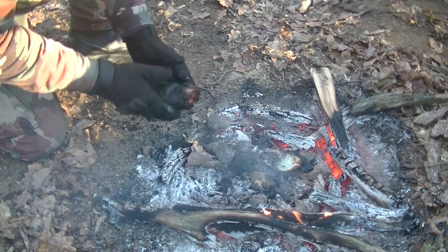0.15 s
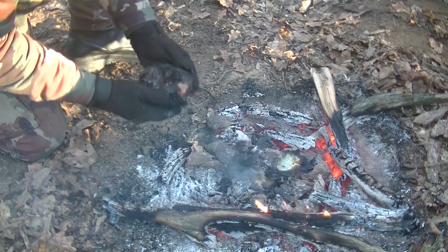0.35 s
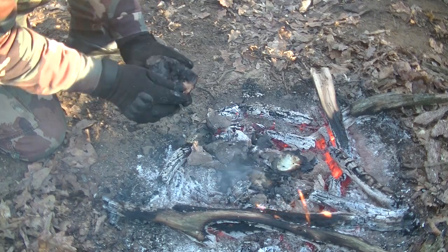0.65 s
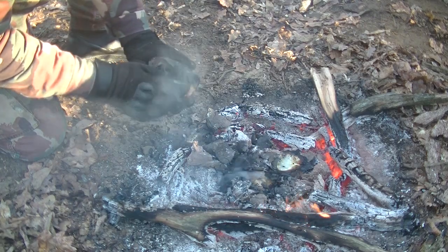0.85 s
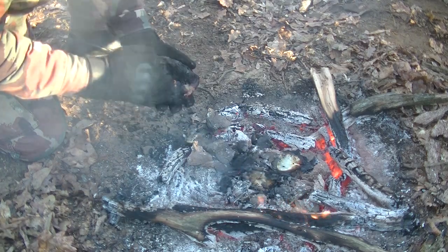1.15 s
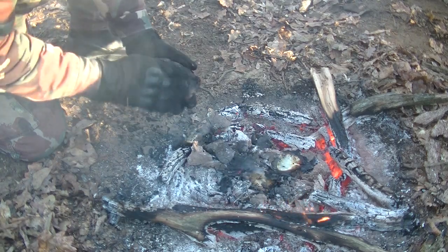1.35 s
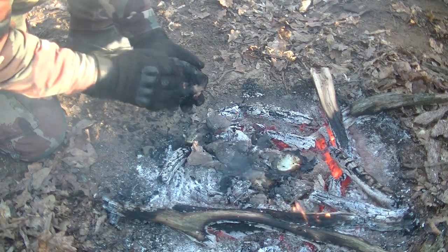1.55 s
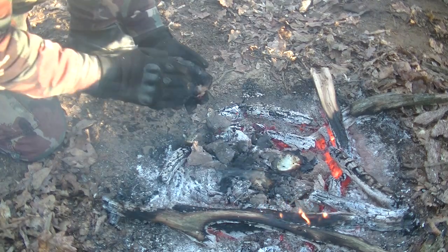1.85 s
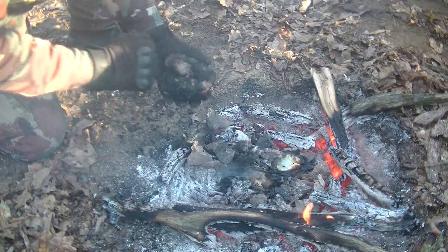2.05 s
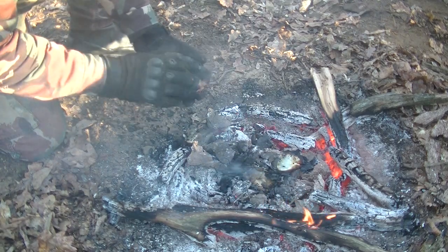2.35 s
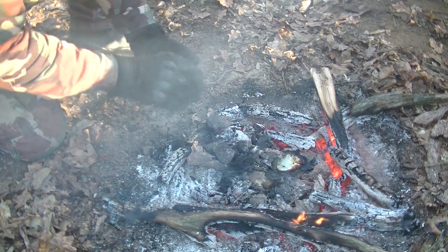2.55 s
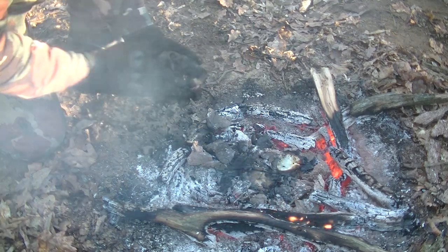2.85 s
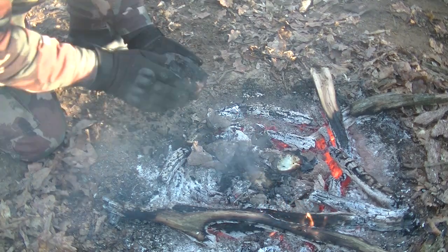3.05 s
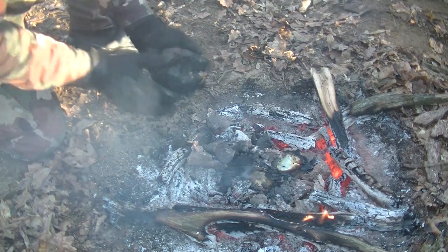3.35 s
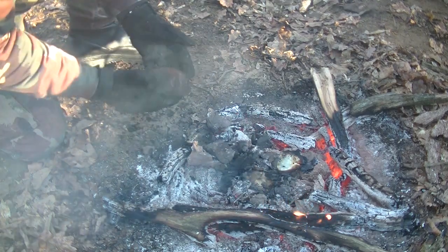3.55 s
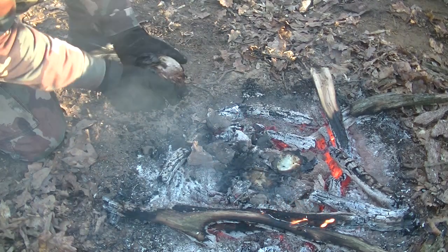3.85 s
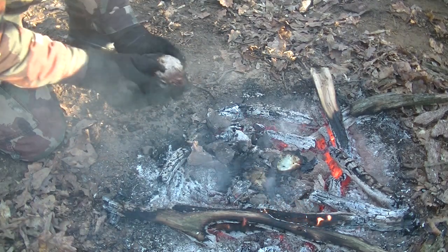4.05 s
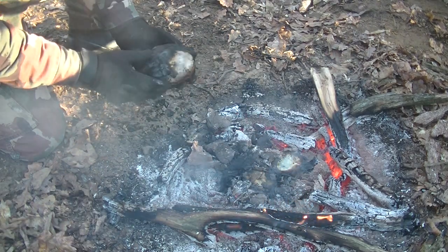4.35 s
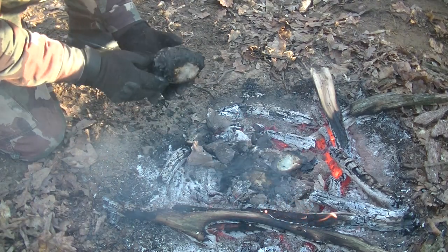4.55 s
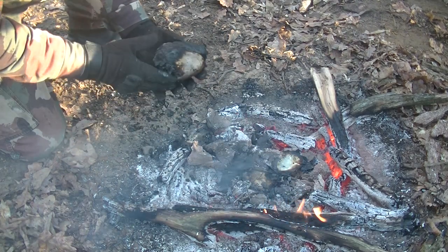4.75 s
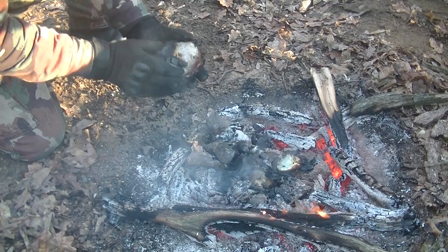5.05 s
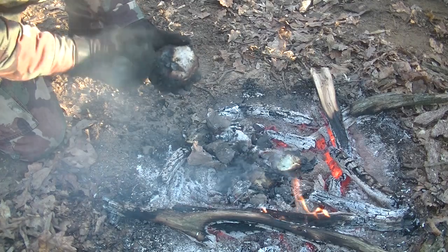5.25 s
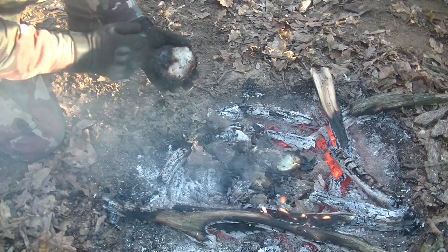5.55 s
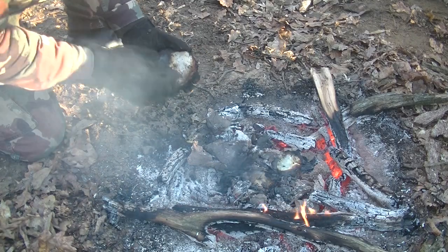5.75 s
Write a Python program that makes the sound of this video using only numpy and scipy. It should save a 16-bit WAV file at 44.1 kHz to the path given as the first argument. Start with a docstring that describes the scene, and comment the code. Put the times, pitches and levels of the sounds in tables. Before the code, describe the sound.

Gloved hands break a hardened clay crust close to a stereo microphone, outdoors in a quiet wood beside low embers. From 0 to 0.6 seconds come sharp snaps and small crunches, thickest near 0.5, with faint glove rub. After a brief easing, stronger gritty crunches arrive at about 1.05, 1.4, 1.7 and 2.0, with an especially hard snap near 1.36. A quieter stretch follows, holding stray clicks and soft low breeze buffets, until crumbling resumes at 2.85 and 3.15. A bright hard crack stands out at 3.8. Between 4 and 5 the clicks are scattered and lighter; a rub swells around 5.2, then a dense run of darker crunches and brittle snaps comes at 5.4 to 5.5, with more near 5.8. Underneath throughout: soft flickering ember hiss, tiny ticks of embers and falling crumbs, and a faint low woodland hush. The sound is dry, with subtle short outdoor scatter.

```python
"""Gloved hands squeeze and peel a crust of baked clay beside a low campfire in a wood.
Each squeeze is a short crunch of tiny ringing fractures, swelling out of the rub of the gloves.
Single flakes snap off: a burst of noise and a ring of a few milliseconds.
Shaped noise makes the hiss of the embers, the hush of the wood and a light breeze on the microphone;
sparse fractures make the faint ticks of embers and falling crumbs."""
import sys
import numpy as np
from scipy import signal
from scipy.fft import rfft, irfft, next_fast_len
from scipy.io import wavfile
from scipy.ndimage import uniform_filter1d

SR = 44100
rng = np.random.default_rng(int(sys.argv[2]) if len(sys.argv) > 2 else 0)


def materialize(psi):
    """Save the field psi as 16-bit PCM at rate SR to the path in sys.argv[1].

    A 1-D psi becomes a single channel; in a 2-D psi each row is a channel.
    """
    bounded = np.clip(np.atleast_2d(psi).T, -1, 1)
    quanta = np.round(bounded * 32767).astype(np.int16)
    wavfile.write(sys.argv[1], SR, quanta)


N = 259749
TIME = np.arange(N) / SR
SIZE = next_fast_len(N + SR // 2)   # room for filter tails
BIN_HZ = np.maximum(np.arange(SIZE // 2 + 1) * SR / SIZE, 1)
OPPOSITE = np.array([[1], [-1]])   # in phase at the left port, inverted at the right


def from_db(db):
    """Decibels to gain."""
    return 10 ** (np.asarray(db) / 20)


def rms_one(x):
    """Scale to rms 1."""
    return x / np.sqrt(np.mean(x ** 2) + 1e-20)


def per_bin(points):
    """Read a table at every frequency bin, straight lines over log frequency."""
    hz, value = np.transpose(points)
    return np.interp(np.log(BIN_HZ), np.log(hz), value)


def filtered(x, response):
    """Pass a sound through a frequency response."""
    return irfft(rfft(x, SIZE) * response, SIZE)[..., :N]


def colour(points):
    """Causal (minimum-phase) response of unit power with the given spectrum."""
    cepstrum = irfft(np.log(rms_one(from_db(per_bin(points)))), SIZE)
    # folding the cepstrum forward in time gives minimum phase
    cepstrum[1:SIZE // 2] *= 2
    cepstrum[SIZE // 2 + 1:] = 0
    return np.exp(rfft(cepstrum))


def drift(rate_hz):
    """Smooth random wander with spread 1, made of noise rolled off above the given rate."""
    return rms_one(filtered(rng.standard_normal(SIZE), 1 / (1 + (BIN_HZ / rate_hz) ** 2)))


def bell(x):
    """Smooth swell and fall, 1 at x = 0."""
    return np.exp(-np.minimum(x ** 2, 60))


def grains(per_s, spread_db, cycles, count=30):
    """Random tiny fractures, each a click that rings at one of many pitches, dying 60 dB in some cycles."""
    sizes = from_db(spread_db * np.minimum(rng.exponential(1, N), 2.5))
    signs = rng.choice([-1, 1], N)
    clicks = sizes * signs * (rng.random(N) < per_s / SR)
    dealt = rng.integers(0, count, N)
    ringing = 0
    for k, hz in enumerate(np.geomspace(1100, 15000, count)):
        w = 2 * np.pi * hz / SR
        r = np.exp(-np.log(1000) * hz / (cycles * SR))
        struck = clicks * (dealt == k) + 1e-18   # the tiny offset keeps the filter off zero
        ringing = ringing + signal.lfilter([1 - r, 0, r - 1], [1, -2 * r * np.cos(w), r * r], struck)
    return rms_one(rms_one(ringing) + 0.68 * rms_one(clicks))


# Tone of crumbling clay, only its shape counts: pitch_hz, density_db (per Hz)
CLAY_TONE = [(290, -52), (500, -20), (919, -18.5), (1510, -15), (2070, -3), (3110, -0.5), (3700, -1),
             (4090, -9.5), (4870, -2), (5550, -4), (6900, -2), (11100, -13.5), (12500, -17), (15100, -15.5),
             (16000, -22)]


def crumble(per_s=6500, clump_db=2.0):
    """Steady crumbling: fractures come in clumps, but the hand sets their overall force."""
    grit = grains(per_s, spread_db=4.5, cycles=7.8) * from_db(clump_db * drift(200))
    grit = filtered(grit, colour(CLAY_TONE))
    # even out the level over 600 samples
    return grit / np.sqrt(uniform_filter1d(grit ** 2, size=600) + 1e-12)


# Squeezes of the crust: peak_s, level_db, swell_s, brightness_db (fine crumbs over coarse)
SQUEEZES = [(0.187, -48, 0.011, -9), (0.452, -40.5, 0.018, -1.5), (0.497, -39.5, 0.022, -2.5),
            (0.597, -45, 0.021, 1.5), (1.052, -34.5, 0.017, 1), (1.118, -43.5, 0.029, -6.5),
            (1.395, -31, 0.022, 1.5), (1.688, -30.5, 0.023, 2.5), (1.983, -36, 0.017, -1),
            (2.014, -32.5, 0.01, 0.4), (2.833, -41.5, 0.013, -0.5), (2.868, -39, 0.01, 4),
            (3.128, -43.5, 0.021, -9), (3.154, -35.5, 0.0084, -3.5), (3.424, -38.5, 0.0067, -15),
            (3.764, -40, 0.0081, -6), (3.845, -42, 0.042, -11.5), (4.378, -43, 0.035, 6.5),
            (4.64, -47, 0.028, -1), (4.76, -48, 0.04, -4), (5.086, -42, 0.021, -2),
            (5.141, -38.5, 0.014, -3), (5.429, -35.5, 0.0087, -11), (5.458, -38, 0.019, -4.5),
            (5.488, -32.5, 0.0044, -8), (5.51, -40, 0.0056, -10), (5.757, -39.5, 0.0098, -11),
            (5.814, -38, 0.022, -1.5)]
# Gloves rubbing over the crust between squeezes: time_s, level_db
GLOVE_RUB = [(0.0, -53), (0.4, -53.5), (0.75, -59), (1.0, -51.5), (1.25, -68), (2.45, -62), (2.7, -81),
             (3.2, -59), (3.6, -53), (4.15, -54), (4.5, -58.5), (4.9, -56.5), (5.2, -48), (5.3, -68),
             (5.89, -83)]
FALL_PER_RISE = 0.97   # a squeeze dies away about as fast as it swells
SLIP_DB, SLIP_LENGTHS = -20.5, 2.17   # grip slipping around a squeeze: level under it, length in its lengths


def crunches(hinge_hz=4500, chunk_hz=1900, wide_hz=9000, rub_bright_db=0.5):
    """Each squeeze swells and dies over the rubbing gloves; fine crumbs sound bright, coarse chunks dark."""
    peak_s, level_db, swell_s, bright_db = np.transpose(SQUEEZES)[:, :, None]
    steps = TIME[::32]   # levels move slowly, so a coarse clock will do
    since = (steps - peak_s) / swell_s / np.where(steps < peak_s, 1, FALL_PER_RISE)
    slip = from_db(SLIP_DB) ** 2 * bell(since / SLIP_LENGTHS)
    squeeze_power = from_db(level_db) ** 2 * (bell(since) + slip)
    rub_power = from_db(np.interp(steps, *np.transpose(GLOVE_RUB))) ** 2
    power = np.vstack([squeeze_power, rub_power])

    fine_share = 1 / (1 + from_db(-np.vstack([bright_db, [rub_bright_db]])) ** 2)
    coarse_share = 1 - fine_share
    chunk_share = coarse_share ** 1.75 * 1.72   # big chunks come mostly from dark squeezes

    def envelope(share):
        """Gain over time of one grain size; an even share (one half) leaves the level as it is."""
        return np.interp(TIME, steps, np.sqrt(2 * (power * share).sum(0)))

    # crumbs break all over the crust, so the shortest waves differ between the ports
    apart = 0.48 / (1 + (wide_hz / BIN_HZ) ** 6)
    shared = filtered(crumble(), np.sqrt(1 - apart))
    grit = shared + filtered(crumble(), np.sqrt(apart)) * OPPOSITE
    lowest = filtered(grit, 1 / (1 + (BIN_HZ / chunk_hz) ** 4))
    lows = filtered(grit, 1 / (1 + (BIN_HZ / hinge_hz) ** 4))
    chunks = envelope(chunk_share) * lowest
    coarse = envelope(coarse_share) * (lows - lowest)
    fine = envelope(fine_share) * (grit - lows)
    return chunks + coarse + fine


def diffuse(spectrum, likeness):
    """Stereo noise from all around; likeness is the correlation of the ports, the shared part has rms 1."""
    mid, side = rng.standard_normal((2, N))
    likeness = np.clip(likeness, -.95, .95)
    width = np.sqrt((1 - likeness) / (1 + likeness))
    return filtered(mid + width * side * OPPOSITE, colour(spectrum))


# Tone of the ember hiss, only its shape counts: pitch_hz, density_db (per Hz)
EMBER_TONE = [(530, -22.5), (900, -13), (1700, -6.5), (1810, -3.5), (2020, -2.5), (3190, 0), (4680, -3),
              (6640, -4.5), (10000, -8.5), (12100, -13), (14700, -16.5), (16000, -16)]


def ember_hiss(shared_db=-54.5):
    """Embers hiss as diffuse noise whose level flickers by a decibel or so."""
    return from_db(shared_db) * diffuse(EMBER_TONE, likeness=0.31) * from_db(1.2 * drift(25))


# Tone of the hush of the wood, only its shape counts: pitch_hz, density_db (per Hz)
WOOD_TONE = [(15, -68), (25, -19), (96, -17), (130, -11), (192, -2.5), (297, 3), (593, -4), (679, -8.5),
             (738, -5.5), (1400, -15.5), (1820, -32), (3080, -120)]


def wood_hush(shared_db=-65.5):
    """The wood is a steady, low diffuse noise, nearly unrelated at the two ports."""
    return from_db(shared_db) * diffuse(WOOD_TONE, likeness=0.032)


# Tone of the breeze, only its shape counts: pitch_hz, density_db (per Hz)
BREEZE_TONE = [(25, -24), (60, -8.5), (90, -3), (135, 0), (220, -4), (330, -14.5), (600, -36)]
# Breeze brushing the microphone, level of the shared part before its flutter: time_s, level_db
BREEZE_GUSTS = [(0.0, -62), (0.11, -72), (0.16, -58.5), (0.33, -65.5), (0.59, -68), (0.64, -74), (0.7, -64),
                (0.82, -73), (0.87, -64), (0.95, -75), (1.51, -70), (1.76, -54.5), (2.12, -65.5),
                (2.15, -59), (2.25, -69), (2.38, -58.5), (2.74, -71.5), (2.84, -61.5), (2.87, -69.5),
                (3.18, -70), (3.2, -63.5), (3.28, -75), (3.9, -68.5), (3.95, -74), (5.71, -75), (5.89, -75)]


def breeze():
    """Moving air brushes the ports: low noise that follows the gusts and flutters around them."""
    gust_db = np.interp(TIME, *np.transpose(BREEZE_GUSTS))
    return from_db(gust_db + 2.0 * drift(13)) * diffuse(BREEZE_TONE, likeness=-0.32)


# Tone of a crack, for ticks and snaps, only its shape counts: pitch_hz, density_db (per Hz)
CRACK_TONE = [(400, -35), (1100, -20), (2000, -0.5), (3000, 0), (4100, 0), (5000, -3), (7000, -0.5),
              (9500, -9), (13000, -11.5), (16000, -20)]


def ticks(per_s=90, level_db=-65.0):
    """Sparse faint ticks of embers and falling crumbs."""
    return from_db(level_db) * filtered(grains(per_s, spread_db=3.5, cycles=16), colour(CRACK_TONE))


STRAYS_PER_S, STRAY_DB, SPREAD_DB = 7.1, -44, 3   # faint flakes at any time; the spread is for chips too
LOW_HZ, HIGH_HZ, RING_SHARE = 2320, 7400, 0.29   # pitch range and ringing share of chips and strays
CHIP_DB = 3   # energy of a chip over the level of its squeeze


def small_flakes(count=100):
    """Random lesser snaps, as rows like FLAKE_SNAPS: two chips near each squeeze, and strays at any time."""
    peak_s, level_db, swell_s, _ = np.repeat(SQUEEZES, 2, axis=0).T
    chips_s = peak_s + swell_s * (2 * rng.random(len(peak_s)) - 1)
    strays_s = np.cumsum(rng.exponential(1, count)) / STRAYS_PER_S
    start_s = np.concatenate([chips_s, strays_s])
    energy_db = np.concatenate([level_db + CHIP_DB, np.full(count, STRAY_DB)])
    energy_db = energy_db + SPREAD_DB * (2 * rng.random(len(start_s)) - 1)
    pitch_hz = LOW_HZ * (HIGH_HZ / LOW_HZ) ** rng.random(len(start_s))
    return np.column_stack([start_s, energy_db, pitch_hz, np.full(len(start_s), RING_SHARE)])


# Larger flakes snapping off: start_s, energy_db (as if packed into 1 ms), pitch_hz,
# ring_share (0-1, no unit, held to 0.95 at most)
FLAKE_SNAPS = [(0.0605, -32.5, 2400, 0.73), (0.1787, -24, 3240, 0.65), (0.2555, -20.5, 6360, 0.24),
               (0.3535, -34, 3420, 0.1), (0.444, -25.5, 4690, 0.27), (0.471, -27.5, 6500, 0.6),
               (0.486, -25.5, 4950, 0.7), (0.5024, -27, 2570, 0.3), (0.7543, -38, 6800, 0.15),
               (0.8853, -37.5, 3430, 0.3), (1.0459, -27.5, 6540, 0.6), (1.1283, -24, 2910, 1),
               (1.3628, -16, 2960, 0.56), (1.6688, -26, 7280, 0.3), (1.7109, -24, 7000, 0.7),
               (1.9834, -26, 4660, 0.3), (2.3538, -31.5, 3470, 0.94), (3.1465, -30, 3530, 0.2),
               (3.1547, -28.5, 4880, 0.9), (3.3728, -38.5, 2150, 0.4), (3.4223, -27, 4710, 0.47),
               (3.7401, -25, 7000, 0.7), (3.7775, -32, 5340, 0.35), (3.8041, -19, 5320, 0.69),
               (3.8405, -30, 4670, 0.2), (4.0789, -32.5, 11600, 0.94), (4.321, -29, 4800, 0.58),
               (4.6203, -24.5, 6600, 0.5), (4.7633, -28, 2950, 0.4), (4.802, -30, 6140, 0.55),
               (4.8575, -34.5, 6140, 0.4), (5.03, -22.5, 5070, 0.33), (5.1335, -25.5, 3030, 0.57),
               (5.2237, -36, 5150, 0.13), (5.359, -38.5, 2300, 0.7), (5.3936, -36.3, 7840, 0.6),
               (5.4187, -25.5, 3700, 0.37), (5.469, -30, 2920, 0.6), (5.485, -27.5, 3100, 0.9),
               (5.513, -30, 3180, 0.8), (5.7535, -34, 2270, 0.8), (5.7974, -28, 3190, 0.8),
               (5.876, -26.5, 6500, 0.4)]
SNAP_DECAY_S, TYPICAL_HZ, TYPICAL_DB = 0.00081, 4000, -26   # base decay time, for a typical flake
DECAY_PER_PITCH, DECAY_PER_FORCE = -0.5, -0.36   # power laws: small flakes and hard breaks end sooner


def snaps(crack_part=0.98, ring_part=1.48, lead_db=-26.0, lead_s=0.0016, size=1000):
    """Amid faint microcracks the flake parts with a burst of noise and rings at its own pitch."""
    cracks, rings = np.zeros((2, N + size))
    before = size // 5
    t = (np.arange(size) - before) / SR
    after = np.maximum(t, 0)
    one_ms = np.sqrt(SR / 1000 / size)   # packs the energy as if into 1 ms
    opening = 1 - np.exp(-after / .00008)
    lead = from_db(lead_db) * np.exp(-np.abs(t) / lead_s)
    for start_s, energy_db, pitch_hz, share in [*FLAKE_SNAPS, *small_flakes()]:
        i = int(start_s * SR) - before
        share = np.clip(share, 0, .95)
        if not 0 <= i < N:
            continue
        decay = SNAP_DECAY_S * (pitch_hz / TYPICAL_HZ) ** DECAY_PER_PITCH
        decay *= from_db(energy_db - TYPICAL_DB) ** DECAY_PER_FORCE
        gain = from_db(energy_db) * one_ms
        burst = opening * np.exp(-after / (crack_part * decay))
        crack = rng.standard_normal(size) * (lead + burst)
        ring = np.sin(2 * np.pi * pitch_hz * after) * opening * np.exp(-after / (ring_part * decay))
        # a flake radiates little far below its own pitch
        small = signal.butter(2, min(0.38 * pitch_hz, SR / 4), "high", fs=SR)
        cracks[i:i + size] += gain * np.sqrt(1 - share) * rms_one(signal.lfilter(*small, crack))
        rings[i:i + size] += gain * np.sqrt(share) * rms_one(signal.lfilter(*small, ring))
    return filtered(cracks[:N], colour(CRACK_TONE)) + rings[:N]


def reflections(x, decay_s, gap_s, size=16000):
    """A dying spray of small echoes, different at each port, that fades in over the gap."""
    t = np.arange(size) / SR
    spray = rng.standard_normal((2, size)) * np.exp(-t / decay_s) * np.clip(t / gap_s, 0, 1) ** 2
    return signal.fftconvolve(x, rms_one(spray) / np.sqrt(size), axes=1)[:, :N]


# Level balance of the two microphone ports, facing the hands: pitch_hz, left_minus_right_db
LEVEL_BALANCE = [(1000, -1.5), (2300, 1), (3300, -4), (4200, 3.5), (5200, 2), (6300, -1.5), (8300, -5),
                 (10500, -4.5), (12500, 5), (15500, 0)]
# Phase between the ports: pitch_hz, left_lead_rad
PHASE_LEAD = [(900, 1.2), (2300, 0.23), (3300, 0.59), (4000, 1.47), (5100, .05), (7500, 0.65), (9000, 1.96),
              (11000, 1.8), (12500, 0.95), (15000, 1.2)]
# Sound scattered by the leaves and ground close by: pitch_hz, level_db
NEAR_SCATTER = [(500, -10), (2000, -16.5), (4000, -9.5), (6000, -11.5), (8500, -6), (16000, -4.5)]


def at_ports(x, trees_db=-20.0):
    """The direct sound reaches the ports with unequal colour and phase; ground and trees scatter it."""
    half = 0.5 * OPPOSITE   # each port takes half of the difference
    balance_db = half * per_bin(LEVEL_BALANCE)
    direct = filtered(x, from_db(balance_db) * np.exp(1j * half * per_bin(PHASE_LEAD)))
    near = reflections(x, decay_s=0.0045, gap_s=0.0013)
    ground = filtered(near, from_db(per_bin(NEAR_SCATTER) + balance_db))
    trees = from_db(trees_db) * reflections(x, decay_s=0.044, gap_s=0.0042)
    return direct + ground + trees


def scene():
    """Clay and ticks in front, over ember hiss, the hush of the wood and the breeze."""
    front = at_ports(crunches() + ticks() + snaps())
    air = (wood_hush() + breeze()) * from_db([[-1.0], [.9]])   # a little stronger on the right
    return front + ember_hiss() + air


def record(dry, top=0.38, cutoff_hz=16000):
    """The loudest peaks are rounded off, and the treble is cut steeply."""
    rounded = top * np.tanh(dry / top)
    return filtered(rounded, 1 / np.sqrt(1 + (BIN_HZ / cutoff_hz) ** 300))


dry = scene()
out = record(dry)
materialize(out)
```